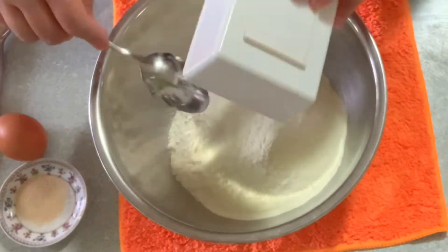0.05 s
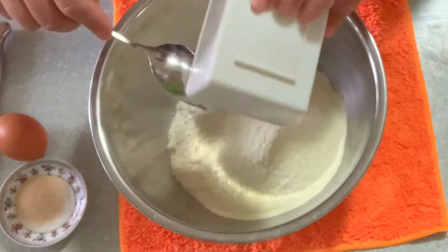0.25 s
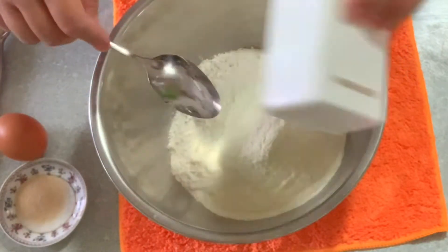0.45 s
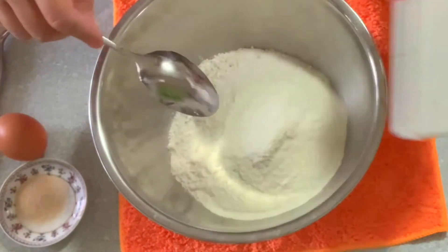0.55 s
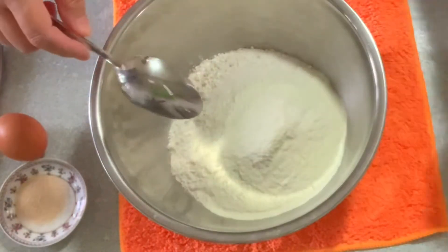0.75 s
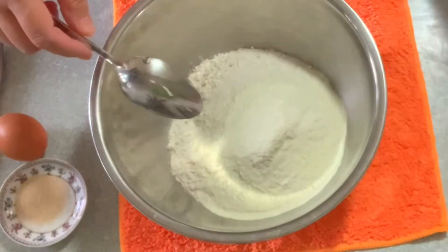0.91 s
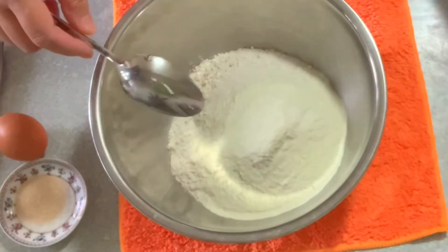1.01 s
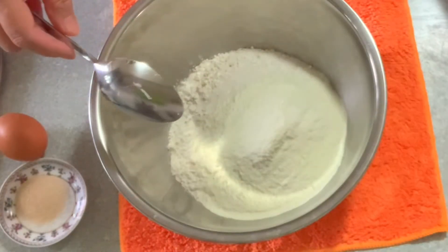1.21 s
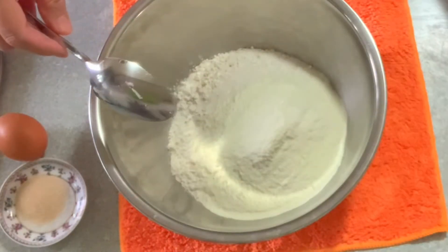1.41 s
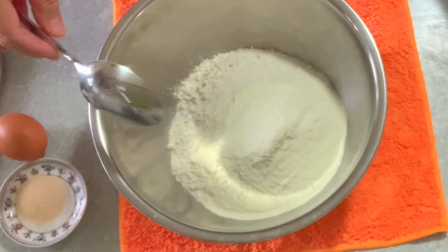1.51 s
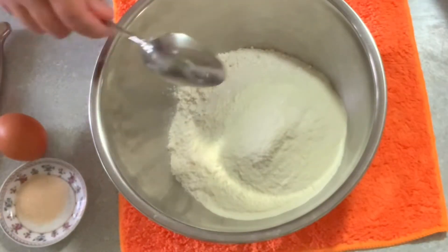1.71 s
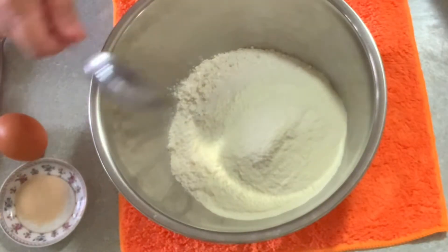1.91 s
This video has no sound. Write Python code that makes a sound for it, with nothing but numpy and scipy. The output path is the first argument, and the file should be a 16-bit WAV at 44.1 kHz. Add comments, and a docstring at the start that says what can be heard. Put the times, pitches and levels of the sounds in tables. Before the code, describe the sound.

A plastic tub raps once, hard and bright, against a steel spoon above a mixing bowl; over a second later come two light ticks and a hollow set-down on the worktop, close up in a small kitchen.

```python
"""A small kitchen heard close up by two microphone ports: a low wavering hum, with faint grainy handling.
A plastic tub knocks once on a steel spoon over a mixing bowl; its shell and the bowl ring as dying sines.
After a weak thud the tub ticks twice, waking a thin spoon ring, and is set down on the worktop.
It lands with hollow thuds: worktop modes over a short noise rumble. Short noise bursts make each contact;
decaying noise gives the kitchen's reflections."""
import sys
import numpy as np
from scipy import signal
from scipy.fft import rfft, irfft, next_fast_len
from scipy.io import wavfile
from scipy.ndimage import uniform_filter1d

SR = 44100
rng = np.random.default_rng(int(sys.argv[2]) if len(sys.argv) > 2 else 0)


def store_wav(level_fs):
    """Save 16-bit WAV to argv[1]."""
    pcm = np.round(np.clip(np.atleast_2d(level_fs), -1, 1) * 32767)
    wavfile.write(sys.argv[1], SR, pcm.T.astype(np.int16))


N = 85995

# Room hum spectrum. Each row: frequency in Hz, relative density in dB per Hz.
HUM_COLOUR = [(20, -16), (40, -8.5), (65, 3.5), (110, -4), (160, -1), (230, -3.5), (290, 3), (400, -15.5),
              (540, -14.5), (680, -11.5), (1000, -18), (2000, -30), (3500, -45), (6000, -44),
              (10000, -51.5), (16000, -58)]
# Decay of the kitchen's reflections. Each row: frequency in Hz, time to fall 60 dB in s.
KITCHEN_DECAY = [(120, 0.17), (400, .3), (1100, 0.44), (2700, 0.4), (7000, 0.32), (14000, 0.2)]
# The two microphone ports. Each row: frequency in Hz, likeness of diffuse sound from 0 to 1,
# left minus right level in dB, extra lead of the left port in radians.
PORT_PAIR = [(80, .99, -1, .1), (300, .96, -4, .45), (480, .8, -4, .9), (700, .6, 0, -.1),
             (1000, .6, 0, -1.0), (1400, .5, 0, -.6), (2150, .5, 2, .5), (2750, .55, 1, .4),
             (3400, .7, -1, -.2), (4400, .98, 0, 0), (9000, .95, 0, 0)]
# Handling rustle over time. Each row: time in s, level in dB.
RUSTLE_LEVEL = [(0, -89), (.5, -75), (1.02, -88.5), (1.06, -74), (1.11, -80.5), (1.349, -75.5),
                (1.6, -68.5), (1.78, -83.5), (1.87, -69.5), (1.95, -74.5)]
# Rustle spectrum. Each row: frequency in Hz, relative density in dB per Hz.
RUSTLE_SPECTRUM = [(200, -11), (900, 1.5), (2500, -0.5), (4000, -10), (7000, -15), (15000, -29.5)]
# Worktop modes. Each row: frequency in Hz, level in dB relative to the thud, time to fall 60 dB in s.
WORKTOP_MODES = [(91.5, -13.5, 0.22), (147.5, -4.5, 0.154), (206.5, -3.5, 0.18), (241.3, -7.5, 0.25),
                 (289.5, -11.5, 0.22), (319.2, -0.5, 0.15), (379.7, -10, 0.11), (499.3, -12.5, 0.19)]
# Rumble of the cupboard under the worktop. Each row: frequency in Hz, relative density in dB per Hz.
CUPBOARD_COLOUR = [(40, -19.5), (90, -7.5), (150, -5.5), (250, -3.5), (330, 1), (420, -16.5), (520, -19.5),
                   (700, -20.5), (1200, -19.5), (3000, -34), (12000, -92)]
# Thuds on the worktop. Each row: start in s, level in dB, tilt in dB per octave.
WORKTOP_THUDS = [(1.05, -51.5, -2.5), (1.400, -43.5, 5), (1.417, -50, 4), (1.519, -54, 14), (1.656, -32, 1),
                 (1.723, -48.5, -6), (1.798, -43.5, 0)]
# Spoon modes. Each row: frequency in Hz, level in dB relative to the touch, time to fall 60 dB in s.
SPOON_MODES = [(980, -3, 0.3), (1264, -6.5, 0.37), (2481, 5, 0.2), (2486, -1, 0.33), (2530, -10, 0.25),
               (3800, -1.5, 0.17)]
# Touches that wake the spoon. Each row: start in s, level in dB.
SPOON_TOUCHES = [(1.3942, -61.5), (1.5149, -52.5)]
# Steel bowl modes. Each row: frequency in Hz, level in dB, time to fall 60 dB in s.
BOWL_MODES = [(482, -45.5, 0.21), (482.4, -38, 0.33), (662, -47.5, 0.44), (1120, -35.5, 0.15),
              (1128, -33.5, 0.45), (1186, -30.5, 0.32), (1190, -36.5, 0.38), (1292, -36.5, 0.18),
              (1323, -35.5, 0.27), (1493, -47.5, 0.4), (2080, -48, 0.23), (2683, -47, 0.4),
              (3100, -48.5, .25), (5750, -44.5, .16)]
# Spectrum of a contact crack. Each row: frequency in Hz, relative density in dB per Hz.
CRACK_COLOUR = [(100, -15), (300, -6.5), (650, -8.5), (1100, 0), (1600, -0.5), (2300, -3), (2950, -5),
                (3500, 0.5), (4200, -9), (4900, -12), (5600, -5.5), (7000, -9.5), (8500, -11.5),
                (11000, -18), (15500, -24.5)]
# Plastic tub modes. Each row: frequency in Hz, time to fall 60 dB in s, then the relative level in dB
# when struck on the wall, corner, edge and base.
TUB_MODES = [(293, 0.058, -3, -22, -10, 5.5), (468.7, 0.077, -1.5, -25, -20, -6),
             (858, .07, -17, -2, 1.5, -1.5), (922, 0.11, -13.5, -27, -2, -10),
             (999, 0.059, -22.5, -2, 5.5, -2), (1097, 0.17, -21, -28, -21.5, -8),
             (1169.7, 0.1, -2.5, -7, -12.5, -22), (1275, 0.028, -10, -18, -10.5, -30),
             (1430.6, 0.032, -3.5, -35, -2.5, -9), (1645, 0.068, -13, -11, -10, -13),
             (1746, 0.041, -15.5, 0.5, -1, -26.5), (1832, 0.053, -13.5, 4.5, -27, 1.5),
             (2140, 0.085, -10, -12.5, -5.5, -13), (2230, 0.026, -12, -15, 8, -32.5),
             (2483, .06, -21, -9, -21, -25), (2640, 0.065, -24, -21, -30, -27),
             (2722, .07, -11, -20, -20, -8), (3170, .06, -17.5, -35.5, -5.5, -11),
             (3376, 0.12, -22.5, -2, -14, -25), (3415, 0.02, -18, -24.5, 5, 14)]
# Where the tub can be struck, in the order of those four level columns.
TUB_SPOTS = ["wall", "corner", "edge", "base"]
# Knocks on the tub. Each row: start in s, spot, ring level in dB, crack level in dB, crack decay in s
# (to 1/e), crack tilt in dB per octave, crack rise in s, send to the kitchen in dB.
TUB_KNOCKS = [(0.205, "wall", -11, -16, .007, 0, .0006, 1.5),
              (1.3937, "corner", -37, -42, 0.007, -1, 0.002, 1.5),
              (1.513, "edge", -37, -42, 0.0062, -0.5, 0.001, 2.5),
              (1.635, "base", -46.5, -46, 0.0145, -3.5, .0005, -18),
              (1.6478, "base", -33, -33.5, .011, -2, 0.0002, 3),
              (1.776, "base", -58, -62, 0.0078, -6, 0.0029, -2),
              (1.796, "edge", -52.5, -46, 0.0113, -8.5, 0.0037, -2.5)]

HUM_DB, HUM_SWELL_DB, HUM_SWELL_S = -57, 0.83, 0.15  # swell: spread of the level and time between its points
KITCHEN_DB, KITCHEN_ONSET_S = -7.5, 0.0017
ECHO_S, ECHO_DB, ECHO_LENGTH_S = 0.022, -4, 0.0088  # a cluster of reflections off the nearest wall
STEEL_SEND_DB, THUD_SEND_DB, RING_SEND_DB = -5.5, 4, -7.5  # sends to the kitchen
LEFT_LAG_S = 5 / 44100
EDGE_HZ = 16200  # upper limit of the recorder
RUSTLE_GRAIN_DB = 1  # spread of the grain's level
THUD_RISE_S, CUPBOARD_DB, CUPBOARD_T60_S = 0.001, -4, 0.3
RING_RISE_S = 0.0023
BOUNCE_S, BOUNCE_DB, BOUNCE_TILT_DB = 0.0032, -8.5, -2.5  # second contact; tilt per octave makes it duller
TUB_LOW_CUT_HZ = 260


def amp(db):
    """Decibels to gain."""
    return 10 ** (np.asarray(db) / 20)


def unit(x):
    """Scales to an rms of one."""
    return x / np.sqrt(np.mean(x ** 2) + 1e-20)


def read(points, hz, axis=1):
    """Reads one column of a table on a log-frequency axis."""
    table = np.transpose(points)
    return np.interp(np.log(hz + 1), np.log(table[0] + 1), table[axis])


def add(mix, s, sound):
    """Mixes a sound in at time s."""
    part = mix[..., round(s * SR):]
    part += sound[..., :part.shape[-1]]


def fall(t, t60):
    """Exponential decay that loses 60 dB in t60 seconds."""
    return np.exp(-np.log(1000) * t / t60)


def swell_in(t, rise_s):
    """Smooth exponential onset."""
    return 1 - np.exp(-t / rise_s)


def noise(colour, tilt_db=0):
    """Two unrelated noises of one colour, each with an rms of one."""
    size = next_fast_len(N, True)
    hz = np.fft.rfftfreq(size, 1 / SR)
    octaves = np.log2((hz + 200) / 2000)  # the tilt flattens out in the bass
    gain = amp(read(colour, hz) + tilt_db * octaves)
    white = rng.standard_normal((2, size))
    return unit(irfft(rfft(white) * gain, size)[:, :N])


def ring(modes, rise_s):
    """Dying sines that swell in briefly; neighbouring modes swing in opposite directions."""
    t = np.arange(N) / SR
    tones = np.zeros(N)
    for k, (hz, db, t60) in enumerate(modes):
        tones += (-1) ** k * amp(db) * fall(t, t60) * np.sin(2 * np.pi * hz * t)
    return tones * swell_in(t, rise_s)


def low_cut(x, hz):
    """Second-order bass roll-off."""
    return signal.sosfilt(signal.butter(N=2, Wn=hz, btype="high", fs=SR, output="sos"), x)


def hum():
    """The low background of the room wavers slightly in level."""
    steps = np.arange(0, N / SR + HUM_SWELL_S, HUM_SWELL_S)
    swell = np.interp(np.arange(N) / SR, steps, rng.standard_normal(len(steps)))
    return amp(HUM_DB + HUM_SWELL_DB * swell) * noise(HUM_COLOUR)


def kitchen(x):
    """Dense reflections, each band dying at its own speed; every call draws a fresh pattern."""
    hz, t, bands = signal.stft(rng.standard_normal((2, SR)), SR, nperseg=256)
    bands = bands * fall(t, read(KITCHEN_DECAY, hz)[:, None])
    tail = signal.istft(bands, SR, nperseg=256)[1]
    t = np.arange(tail.shape[1]) / SR
    echo = amp(ECHO_DB) * np.exp(-((t - ECHO_S) / ECHO_LENGTH_S) ** 2)
    tail = tail * (swell_in(t, KITCHEN_ONSET_S) + echo)
    tail = tail / np.linalg.norm(tail[0])
    return amp(KITCHEN_DB) * signal.fftconvolve(x[None], tail, axes=1)[:, :N]


def ports(sound):
    """Two ports hear one wave, or a partly shared diffuse pair; a lag and a phase turn act on the left."""
    size = next_fast_len(N + 4096)
    hz, z = np.fft.rfftfreq(size, 1 / SR), rfft(sound, size)
    left = right = z
    if z.ndim == 2:  # a diffuse pair
        same = np.clip(read(PORT_PAIR, hz), 0, 1)
        left, right = same * z[0] + np.sqrt(1 - same ** 2) * z[1], z[0]
    lean = amp(read(PORT_PAIR, hz, axis=2) / 2)  # half the difference on each side
    turn = np.exp(1j * (read(PORT_PAIR, hz, axis=3) - 2 * np.pi * hz * LEFT_LAG_S))
    return irfft(np.array([left * lean * turn, right / lean]), size)[:, :N]


def rustle():
    """Faint grainy friction of the things in hand."""
    flicker = unit(uniform_filter1d(rng.standard_normal(N), size=200))
    grain = unit(amp(RUSTLE_GRAIN_DB * flicker))
    level_db = np.interp(np.arange(N) / SR, *np.transpose(RUSTLE_LEVEL))
    return noise(RUSTLE_SPECTRUM) * grain * amp(level_db)


def worktop():
    """Hollow thuds as the tub's weight lands: worktop modes with a short cupboard rumble."""
    out, t = np.zeros(N), np.arange(N) / SR
    shape = fall(t, CUPBOARD_T60_S) * swell_in(t, THUD_RISE_S)
    for s, level_db, tilt_db in WORKTOP_THUDS:
        modes = [(hz, level_db + db + tilt_db * np.log2(hz / 250), t60) for hz, db, t60 in WORKTOP_MODES]
        add(out, s, ring(modes, THUD_RISE_S))
        add(out, s, amp(level_db + CUPBOARD_DB) * shape * noise(CUPBOARD_COLOUR, tilt_db)[0])
    return out


def spoon():
    """A thin metallic ring, likely the spoon, outlasts the two light ticks."""
    out = np.zeros(N)
    for s, db in SPOON_TOUCHES:
        add(out, s, amp(db) * ring(SPOON_MODES, RING_RISE_S))
    return out


def bowl():
    """The steel bowl, damped by flour and a towel, rings on after the first knock."""
    out = np.zeros(N)
    add(out, TUB_KNOCKS[0][0], ring(BOWL_MODES, RING_RISE_S))
    return out


def crack(db, decay_s, tilt_db, rise_s):
    """The dense, quickly dying clatter of a contact, with its immediate rebound."""
    t = np.arange(N) / SR
    shape = amp(db) * np.exp(-t / decay_s) * swell_in(t, rise_s)
    out = shape * noise(CRACK_COLOUR, tilt_db)
    rebound = amp(BOUNCE_DB) * shape * noise(CRACK_COLOUR, tilt_db + BOUNCE_TILT_DB)
    add(out, BOUNCE_S, rebound)
    return out


def tub(spot, ring_db):
    """A knock rings the plastic shell; the spot that is struck sets the mix of modes."""
    column = TUB_SPOTS.index(spot)
    modes = [(hz, ring_db + levels[column], t60) for hz, t60, *levels in TUB_MODES]
    return low_cut(ring(modes, RING_RISE_S), TUB_LOW_CUT_HZ)


def scene():
    """Rings and thuds arrive directly; clatter, rustle, reflections and hum are diffuse."""
    diffuse = hum() + rustle()
    thuds, steel = worktop(), spoon() + bowl()
    direct = steel + thuds
    diffuse += kitchen(amp(STEEL_SEND_DB) * steel + amp(THUD_SEND_DB) * thuds)
    for s, spot, ring_db, crack_db, decay_s, tilt_db, rise_s, send_db in TUB_KNOCKS:
        clatter = crack(crack_db, decay_s, tilt_db, rise_s)
        shell = tub(spot, ring_db)
        reflections = kitchen(clatter[0] + amp(RING_SEND_DB) * shell)
        add(direct, s, shell)
        add(diffuse, s, clatter + amp(send_db) * reflections)
    return ports(direct) + ports(diffuse)


def record(dry):
    """The recorder's band limit: a steep low-pass filter without delay."""
    low_pass = signal.firwin(511, EDGE_HZ, window=("kaiser", 9), fs=SR)
    return signal.oaconvolve(dry, low_pass[None], "same")


dry = scene()
out = record(dry)
store_wav(out)
```